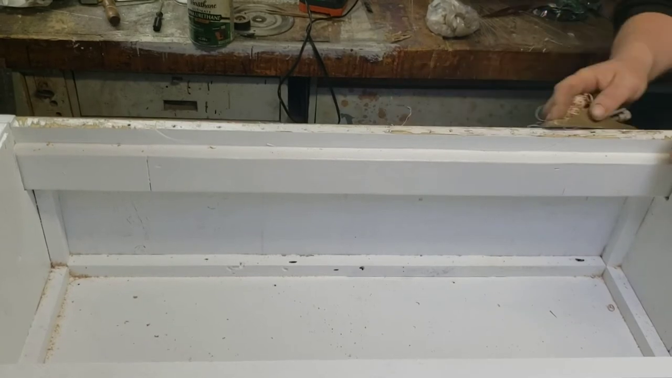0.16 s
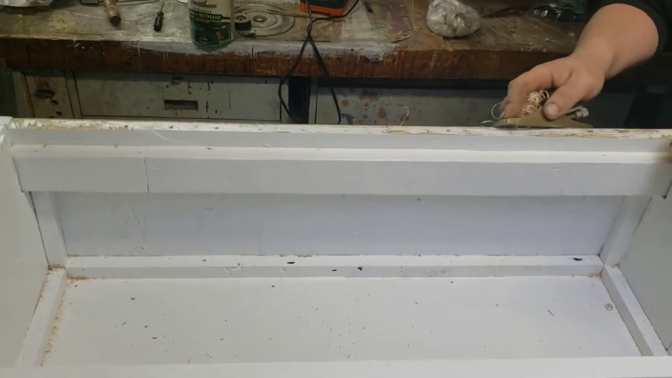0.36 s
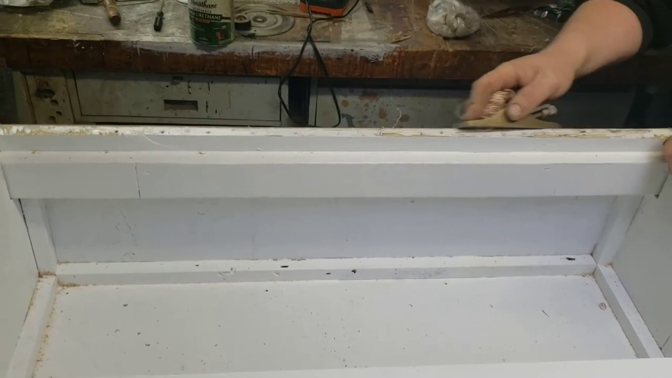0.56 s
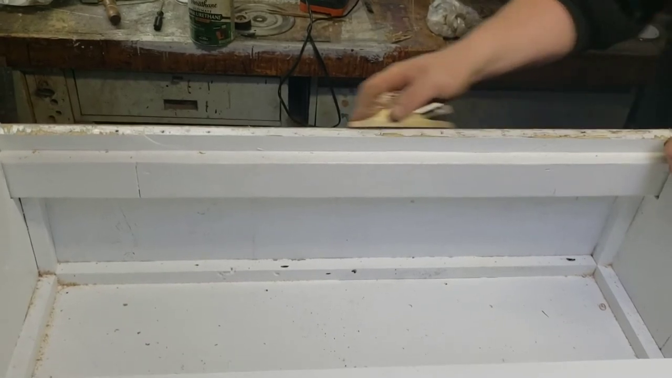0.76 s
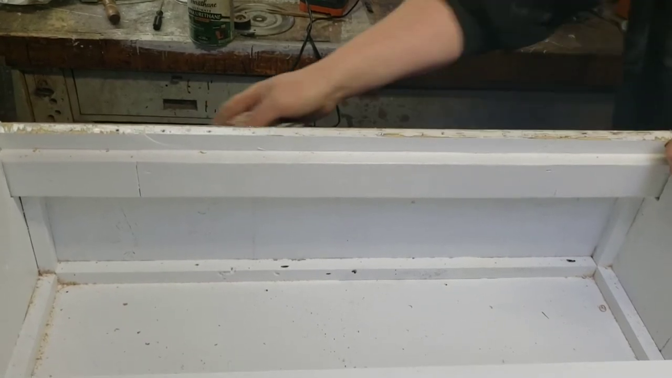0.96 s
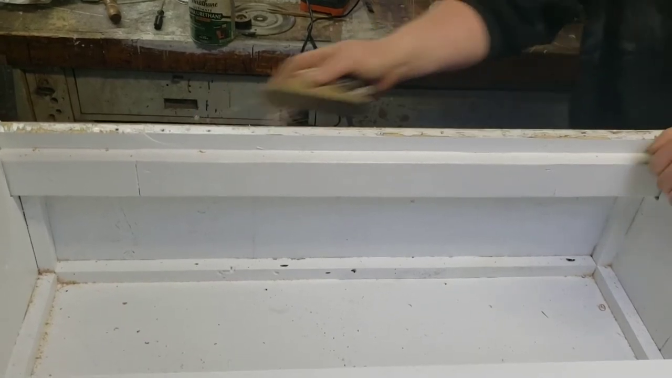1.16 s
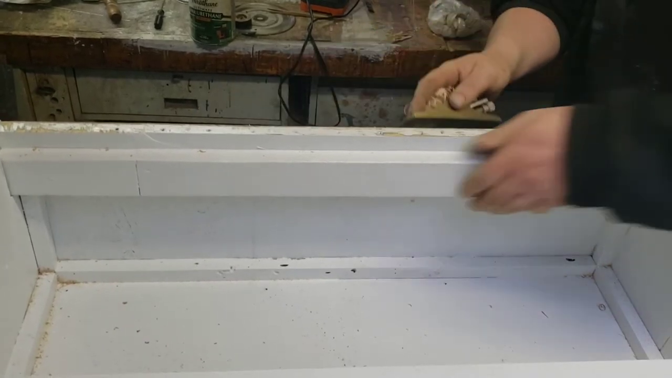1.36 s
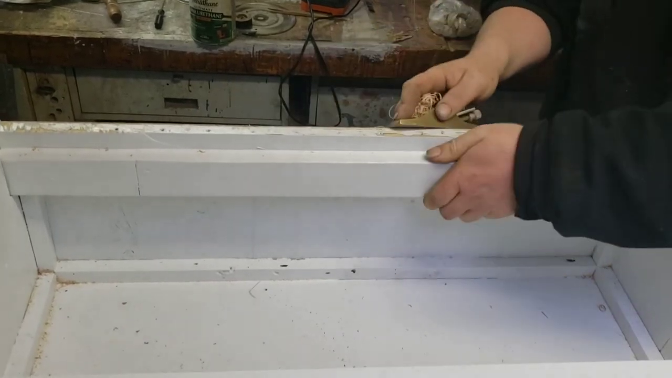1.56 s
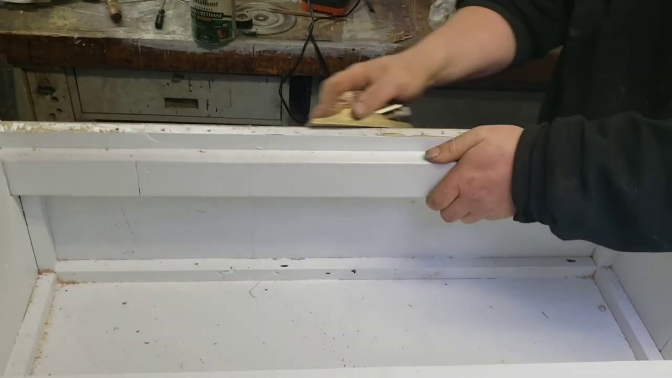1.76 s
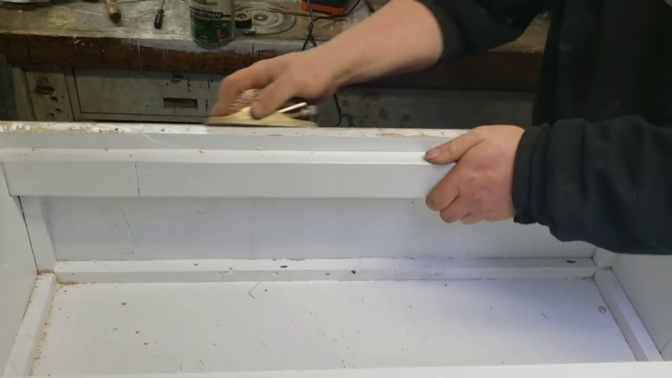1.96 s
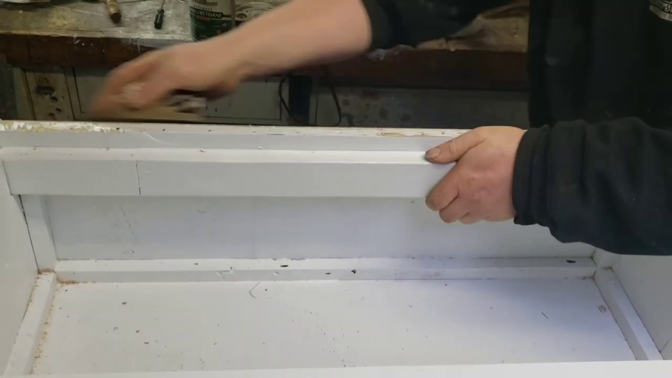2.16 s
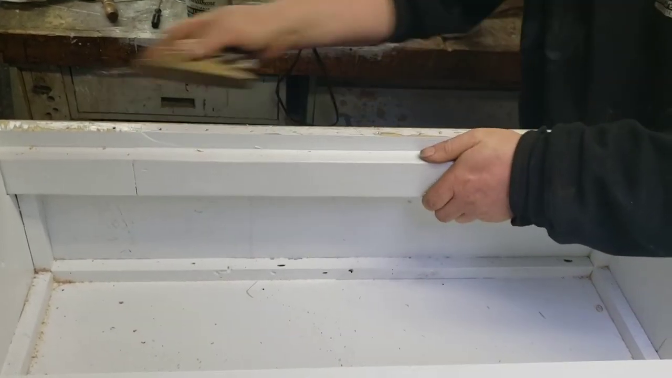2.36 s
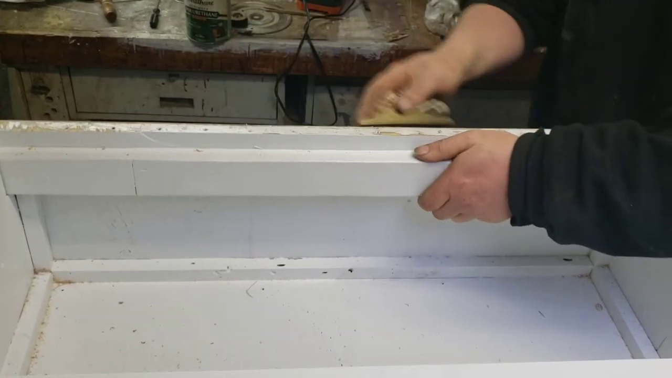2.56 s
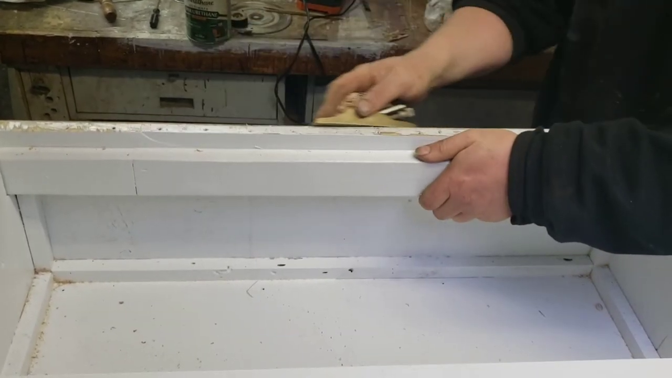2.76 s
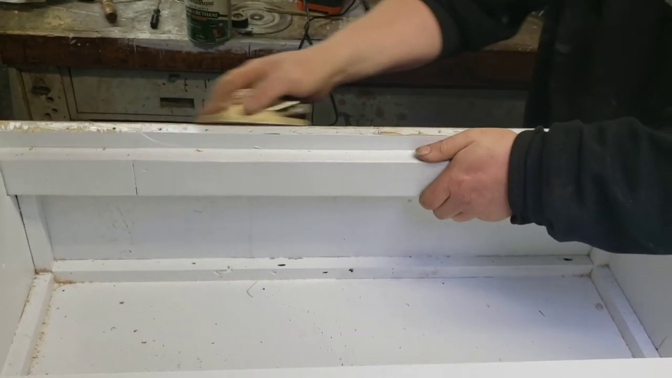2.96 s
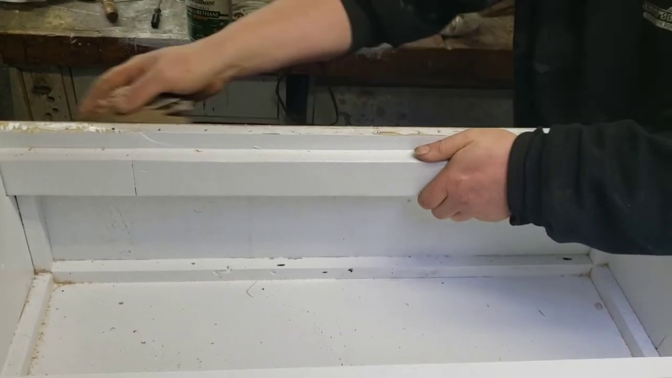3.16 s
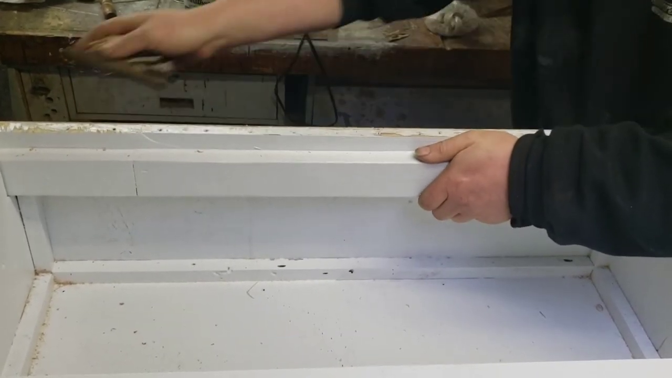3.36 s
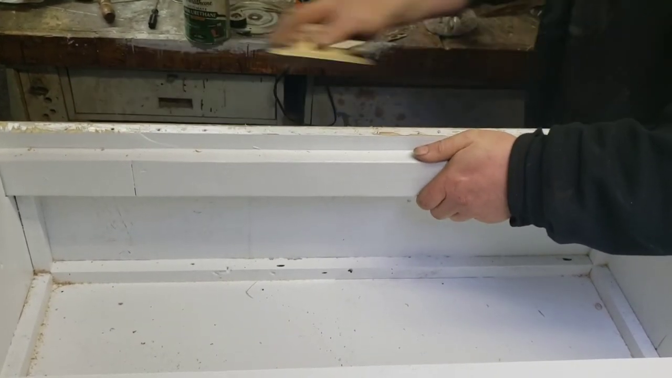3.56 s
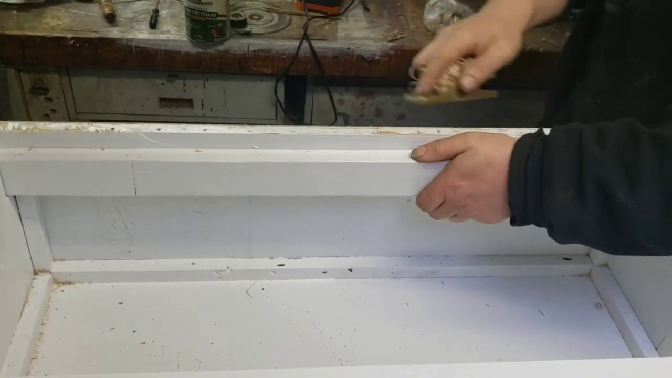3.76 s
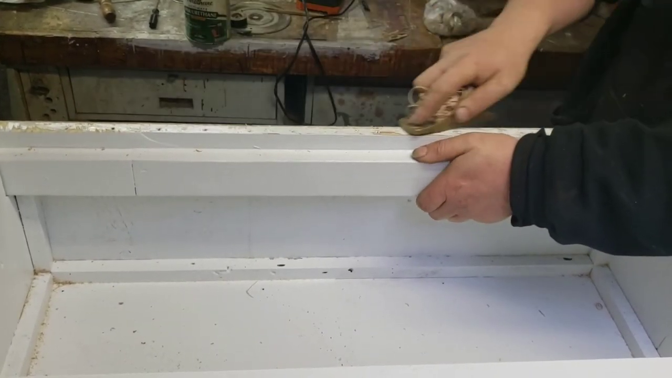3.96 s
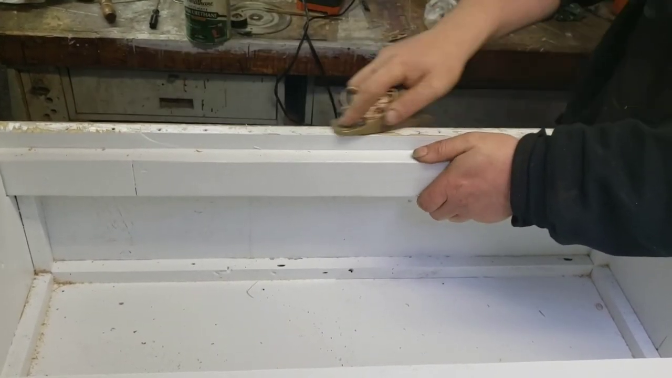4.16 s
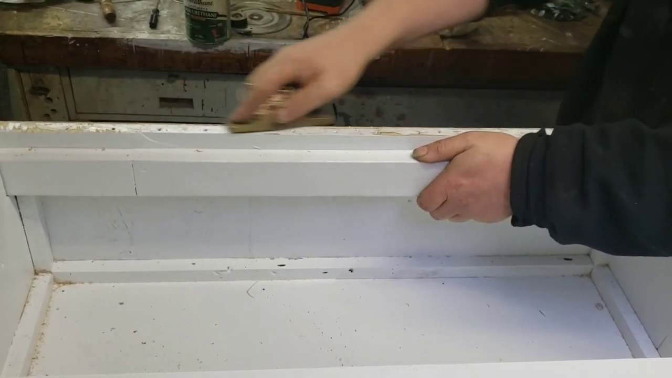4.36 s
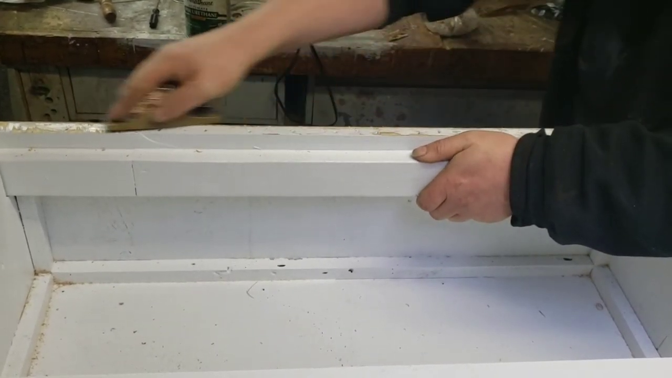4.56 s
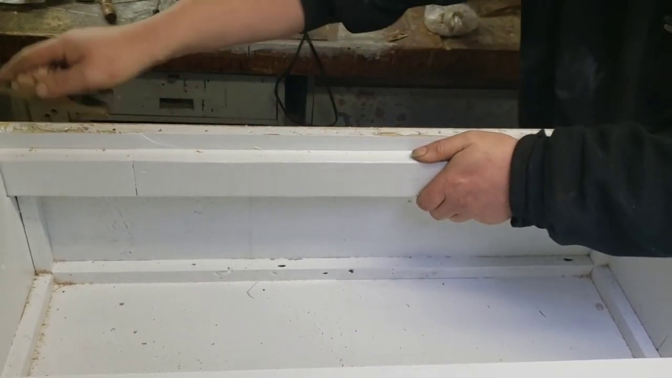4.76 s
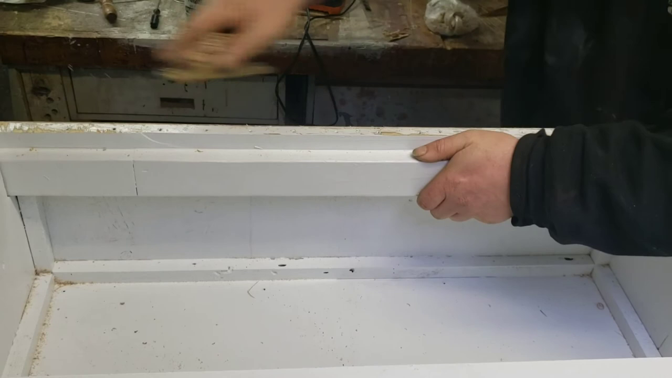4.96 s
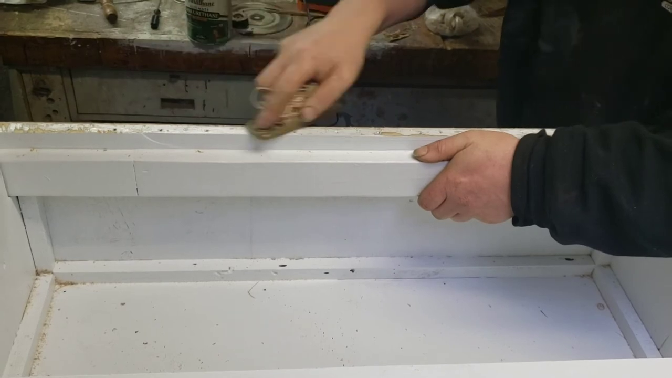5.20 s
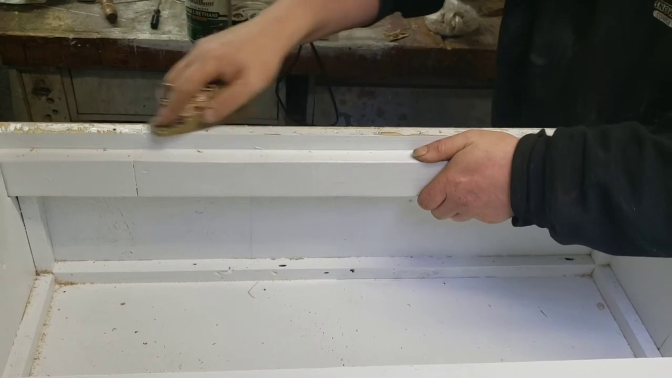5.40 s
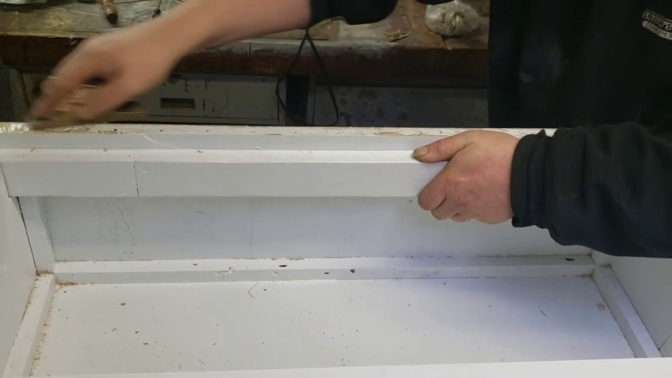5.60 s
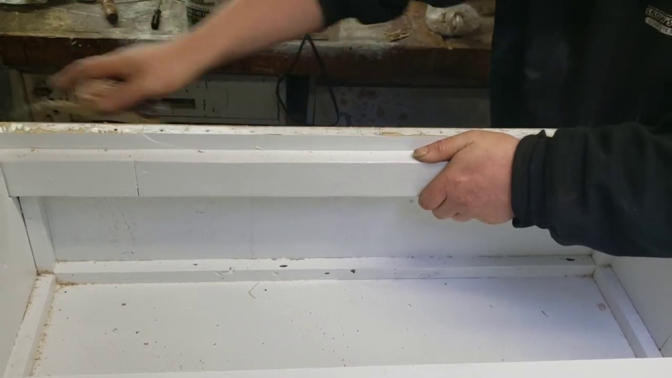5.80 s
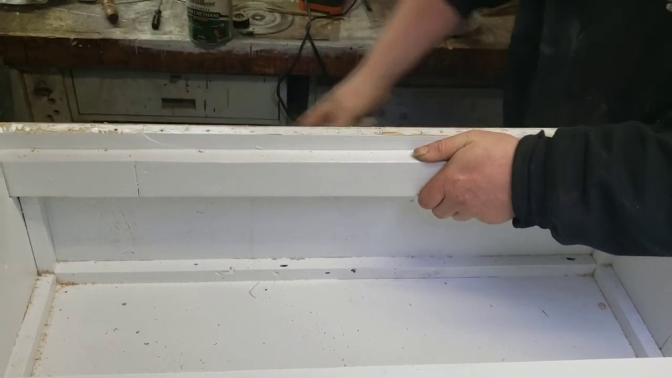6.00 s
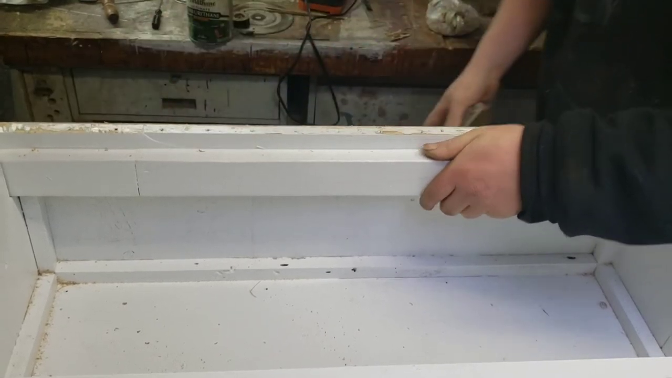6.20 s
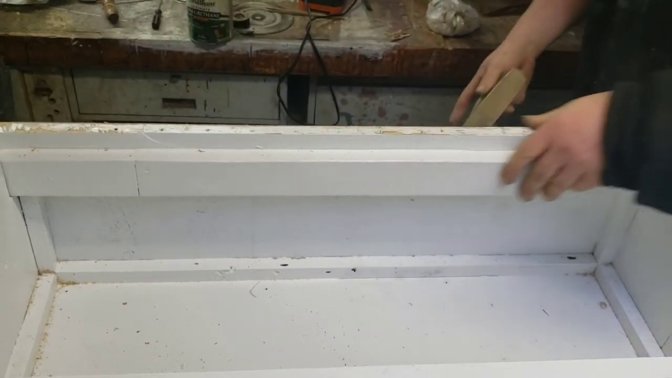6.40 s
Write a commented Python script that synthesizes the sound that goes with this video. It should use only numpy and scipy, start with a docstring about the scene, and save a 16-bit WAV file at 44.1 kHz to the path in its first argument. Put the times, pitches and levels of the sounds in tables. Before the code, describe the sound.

Close by, a metal plane bites into wood: dry, hissy tearing with a rough dragging sole and drumming panels beneath. Strokes swell as the blade sinks in and stop abruptly. Hollow thuds and small metallic clicks mark each landing, two tiny scuffs slip between the strokes, and the box rumbles slightly. Soft hand rustles fill the gaps, ending on a light brush. Short, small-room echo over a faint murmur.

```python
"""A block plane cuts along the top edge of a hollow wooden cabinet, in six longer strokes and two very short ones.
The iron tears fibres (noise shaped by random snaps), the sole drags, and bumps in the wood drum the panels.
The plane also knocks on the wood: the panels ring in many decaying modes and the metal clicks.
Hand and sleeve brush softly in between, and the cabinet rocks with a low rumble.
All this echoes in a small, quiet workshop with a faint steady drone."""
import sys
import numpy as np
from scipy import signal
from scipy.fft import rfft, irfft
from scipy.io import wavfile
from scipy.ndimage import uniform_filter1d

SR = 44100
rng = np.random.default_rng(int(sys.argv[2]) if len(sys.argv) > 2 else 0)


def dump(signal):
    """Clip the signal to [-1, 1] and save it as 16-bit WAV at the path in sys.argv[1]."""
    limited = np.clip(np.atleast_2d(signal).T, -1, 1)
    pcm = np.round(limited * 32767).astype(np.int16)
    wavfile.write(sys.argv[1], SR, pcm)


N = 284004
TIME = np.arange(N) / SR  # seconds


def gain_of(db):
    """Turns decibels into a factor for the sound pressure."""
    return 10 ** (np.asarray(db) / 20)


def evened(x):
    """Scales a signal to an average strength (rms) of 1."""
    return x / np.sqrt(np.mean(x ** 2) + 1e-20)


def read(points, hz):
    """Reads between the points of a table, with pitch on a log scale as the ear hears it."""
    f, value = np.transpose(points)
    return np.interp(np.log(hz + 1), np.log(f + 1), value)


def add(mix, s, sound):
    """Mixes a sound in at time s, cutting off whatever passes the end."""
    part = mix[..., max(round(s * SR), 0):][..., :sound.shape[-1]]
    part += sound[..., :part.shape[-1]]


def colour(x, points, rings=()):
    """Filters by a spectrum table, with narrow resonances on top; the result has rms 1."""
    hz = np.fft.rfftfreq(x.shape[-1], 1 / SR)
    db = read(points, hz)
    for f, width, peak in rings:
        db = db + peak / (1 + (2 * (hz - f) / width) ** 2)
    return evened(irfft(rfft(x) * gain_of(db), x.shape[-1]))


# how alike left and right are: pitch_hz, correlation (1 = the same, 0 = unrelated)
LEFT_RIGHT_LIKENESS = [(30, 1), (150, 0.97), (300, 0.97), (500, 0.81), (1000, 0.32), (2000, -0.15),
                       (15000, 0.024)]


def pair(two):
    """Turns two unrelated signals into left and right: alike in the bass, almost unrelated in the treble."""
    count = two.shape[-1]
    same = read(LEFT_RIGHT_LIKENESS, np.fft.rfftfreq(count, 1 / SR))
    mid, side = rfft(two) * np.sqrt([(1 + same) / 2, (1 - same) / 2])
    return irfft(np.array([mid + side, mid - side]), count)


def noise():
    """Makes hiss with equal strength at every pitch, for left and right."""
    return pair(rng.standard_normal((2, N)))


def wander(hz):
    """Drifts at random with rms 1; movements faster than hz grow weak."""
    f = np.fft.rfftfreq(N, 1 / SR)
    weight = f / (f + 10) / (1 + (f / hz) ** 2)
    return evened(irfft(rfft(rng.standard_normal(N)) * weight, N))


def fibres(per_s, spread_db, snap_s, smooth, chatter_db, chatter_hz):
    """Strength of rubbing wood: random snaps of many sizes die away, clumped as the plane catches and slips."""
    happens = rng.random(N) < per_s / SR
    sizes = gain_of(spread_db * np.minimum(rng.exponential(1, N), 4)) * happens
    power = signal.lfilter([1], [1, -np.exp(-1 / (snap_s * SR))], sizes ** 2)
    strength = np.sqrt(power / power.mean() + smooth)  # smooth: the steady part between snaps
    return evened(strength * gain_of(chatter_db * wander(chatter_hz)))


def patchy(x, patchy_db=2.5):
    """Random patches of louder and softer sound, a few hundred Hz wide and some 40 ms long."""
    z = signal.stft(x, SR, nperseg=512)[2]
    patches = rng.standard_normal(z.shape[1:])
    patches = uniform_filter1d(patches, size=4, axis=0)  # neighbouring pitches move together
    patches = evened(uniform_filter1d(patches, size=8, axis=1))  # and so do neighbouring moments
    return signal.istft(z * gain_of(patchy_db * patches), SR, nperseg=512)[1][:, :N]


# spectrum of the quiet workshop: pitch_hz, level_db (per Hz, relative)
FLOOR = [(22, -24.5), (50, -0.5), (95, 3.5), (140, 3.5), (270, -14), (450, -13.5), (650, -27),
         (1500, -36.5), (7000, -44.5), (15500, -45)]
# its faint steady drone: pitch_hz, width_hz, peak_db
FLOOR_HUM = [(355, 19, 13)]


def quiet_workshop(level_db=-56):
    """A steady low murmur: noise filtered by the floor spectrum with one narrow resonance."""
    return gain_of(level_db) * colour(noise(), FLOOR, FLOOR_HUM)


# time for the echo to die by 60 dB: pitch_hz, time_s
ROOM_T60 = [(150, 0.15), (400, 0.24), (1000, 0.32), (2800, 0.23), (7000, 0.2), (15000, .22)]
# echo against the direct sound: pitch_hz, echo_db
ROOM_DB = [(100, -14.5), (170, -2), (280, -2), (500, -2), (1000, -5.5), (3000, -2.5), (15000, -7.5)]


def room_echo(x, first_s=0.0018):
    """Dense echoes of a small cluttered room: decaying noise in which each band dies at its own speed."""
    count = SR // 2
    hz, t, z = signal.stft(pair(rng.standard_normal((2, count))), SR, nperseg=256)
    t60 = read(ROOM_T60, hz)[:, None]
    decay = gain_of(read(ROOM_DB, hz)[:, None] - 60 * t / t60)
    even_energy = np.sqrt(2 * np.log(1000) / (t60 * SR))  # long and short decays carry equal energy
    tail = signal.istft(z * decay * even_energy, SR, nperseg=256)[1][:, :count]
    tail = tail * np.clip(TIME[:count] / first_s - 1, 0, 1)  # silent until first_s, full at twice that
    return signal.fftconvolve(x, tail, axes=1)[:, :N]


# touches of hand and sleeve: loudest_s, swell_s, fade_s, hiss_db, body_db (both before the trims below)
BRUSHES = [(1.24, 0.032, 0.051, -55.5, -52.5), (1.431, 0.046, 0.091, -63.5, -63),
           (2.52, 0.082, 0.28, -66, -58.5), (3.44, 0.031, 0.043, -56.5, -58),
           (3.646, 0.015, 0.035, -48.5, -47.5), (6.07, 0.026, 0.04, -69, -68.5),
           (6.25, 0.14, 0.33, -68.5, -59), (6.44, 0.082, .1, -50, -52.5)]
# spectrum of the hiss: pitch_hz, level_db (per Hz, relative)
BRUSH_HISS = [(700, -10), (1500, 6), (2400, 0.5), (3400, -0.5), (6500, 5.5), (8500, -4.5), (12000, -7),
              (15500, -5)]
# spectrum of the soft body: pitch_hz, level_db (per Hz, relative)
BRUSH_BODY = [(150, -5.5), (330, 14), (560, 12.5), (900, 6), (1300, -2.5), (3000, -46)]
# rings of the board and the plane under a light touch: pitch_hz, width_hz, peak_db
BRUSH_RINGS = [(840, 60, 8), (2000, 230, 8.5), (2600, 210, 6), (4950, 260, 0), (6100, 160, -2)]


def brushing(hiss_db=-2, body_db=-2):
    """Skin and cloth slide over painted wood: filtered noise that swells and fades with each touch."""
    levels = np.zeros((2, N))
    for loudest, swell, fade, *dbs in BRUSHES:
        since = TIME - loudest
        touch = np.exp(-np.where(since < 0, (since / swell) ** 2, since / fade))
        levels += np.outer(gain_of(dbs), touch)
    hiss = colour(noise(), BRUSH_HISS, BRUSH_RINGS) * levels[0] * gain_of(hiss_db)
    body = colour(noise(), BRUSH_BODY, BRUSH_RINGS) * levels[1] * gain_of(body_db)
    return patchy(hiss + body)


# the cabinet rocks on its feet: middle_s, level_db, half_length_s
ROCKING = [(0.877, -44.5, 0.14), (1.573, -42, 0.063), (2.269, -47, 0.12), (3.385, -46, 0.047)]
# spectrum of the rumble: pitch_hz, level_db (per Hz, relative)
ROCK = [(25, -52.5), (37, -15.5), (47, 2), (72, -2), (95, -11.5), (140, -19.5), (300, -61.5)]


def rocking(push_db=-24):
    """Low rumble of the whole cabinet: a little under every push, more when it sways on its feet."""
    sway = sum(gain_of(db) * np.exp(-((TIME - s) / half) ** 2) for s, db, half in ROCKING)
    panels = planing()[-1]
    return colour(noise(), ROCK) * (sway + panels * gain_of(push_db))


# modes of the cabinet: pitch_hz, above_db (pushed from above, counts 1.5 - tilt times),
# corner_db (pushed on the corner, counts tilt times), t60_s (time to die by 60 dB)
CABINET = [(146.3, 2, -15.5, 0.14), (162.3, -12, -5.5, 0.23), (187.9, -8.5, -4, 0.13),
           (223.3, 4.5, -11, 0.12), (284, -8, -9.5, 0.26), (312.9, -1, -16.5, 0.16), (361, -9, -15, 0.2),
           (399.4, -10, -11.5, 0.13), (447.4, -4, -4, 0.098), (493.3, -6.5, -2.5, 0.13),
           (555, -5, 0.5, 0.068), (640, -19.5, -2, 0.061), (660, -15, -16, 0.066), (783, -10.5, -5.5, 0.16),
           (861, -13.5, -7.5, 0.098), (1034, -20.5, -4.5, 0.14), (1330, -25.5, -6, 0.15),
           (1350, -26.5, -12, .08), (1590, -19.5, -7.5, .11), (2380, -33.5, -14, .05)]
# the crowded upper modes of the panels: pitch_hz, level_db (per Hz, relative)
UPPER = [(250, -15.5), (420, -15.5), (600, -5.5), (850, -3), (1100, -11.5), (1350, -8), (1600, -13),
         (1850, -23), (2500, -19), (5000, -35.5)]


def cabinet(tilt, rise_s=0.00033, upper_db=-9, upper_t60=0.094):
    """Ring of the panels after one blow: its direction picks the modes, and weaker ones merge between them."""
    t = np.arange(SR // 2) / SR
    ring = np.zeros(len(t))
    for k, (hz, above, corner, t60) in enumerate(CABINET):
        db = (1.5 - tilt) * above + tilt * corner - 60 * t / t60
        ring += (-1) ** k * gain_of(db) * np.sin(2 * np.pi * hz * t)
    upper = colour(rng.standard_normal(len(t)), UPPER) * gain_of(upper_db - 60 * t / upper_t60)
    return (ring + upper) * (1 - np.exp(-t / rise_s)) ** 2


def push(hz):
    """Force of one contact: the harder (higher hz), the shorter."""
    t = np.arange(SR // 50) / SR
    force = t * np.exp(-2 * np.pi * hz * t)
    return force / force.sum()


# the plane meets the wood: start_s, force_db, hardness_hz, tilt (0 flat - 1 on the corner),
# click_db (of the metal, at its start)
KNOCKS = [(0.015, -12.5, 420, 0.26, -40), (0.058, -22.5, 1300, 0.12, -38.5),
          (0.318, -31.5, 700, 0.03, -55.5), (0.75, -23, 900, 0.37, -60), (0.7901, -17.5, 700, 0.58, -22.5),
          (1.138, -39.5, 450, 0.27, -56), (1.449, -12, 347, 0.24, -37), (1.53, -28.5, 250, 0, -54),
          (1.669, -20, 395, 0, -42), (2.035, -22, 500, 0, -47.5), (2.409, -54, 1200, 0.5, -53),
          (2.613, -7.5, 330, 0.27, -32), (2.748, -21.5, 402, 0.4, -34.5), (3.23, -23.5, 300, 0.33, -63),
          (3.959, -7, 760, 0.76, -35.5), (3.976, -31, 1000, 0.6, -37.5), (4.182, -23.5, 700, 0.33, -49),
          (4.46, -22.5, 500, 0.55, -49), (5.1682, -13, 1410, 0.72, -29), (5.301, -26.5, 700, 0, -42),
          (5.955, -50, 300, 0.02, -80)]
# spectrum of the metal click: pitch_hz, level_db (per Hz, relative)
CLICK = [(200, 0), (900, 17), (1500, 0.5), (2800, 2), (3900, -4), (5000, -13), (7000, -14.5), (9000, -27.5),
         (15500, -32.5)]


def knocks(click_t60=0.09):
    """The sole lands: a short force makes the cabinet boom, and fading noise makes the metal click."""
    out = np.zeros((2, N))
    t = np.arange(SR // 4) / SR
    for s, force_db, hard_hz, tilt, click_db in KNOCKS:
        boom = signal.fftconvolve(cabinet(tilt), push(hard_hz))
        add(out, s, gain_of(force_db) * boom)
        click = colour(pair(rng.standard_normal((2, len(t)))), CLICK, IRON)
        add(out, s, click * gain_of(click_db - 60 * t / click_t60))
    return out


def drumming(bump_hz=650):
    """Bumps in the wood jolt the sliding plane and keep the panels ringing."""
    out = np.zeros((2, N))
    bumps = noise() * fibres(per_s=370, spread_db=5.5, snap_s=0.0044, smooth=0.26, chatter_db=1.5, chatter_hz=40)
    for row in STROKES:
        start, tilt, panels = row[0], row[5], stroke(*row)[-1]
        force = bumps[:, round(start * SR):][:, :len(panels)] * panels
        ring = signal.fftconvolve(cabinet(tilt), push(bump_hz))
        ring = ring / np.linalg.norm(ring)
        add(out, start, signal.fftconvolve(force, ring[None], axes=1))
    return out


# the iron meets tougher or softer grain for a moment: middle_s, half_length_s,
# more_bite_db, more_crispness_db (on top of the bite), more_drag_db
CATCHES = [(0.557, 0.024, 3.5, -0.5, 6), (0.683, 0.012, 4, -0.5, 3.5), (0.777, 0.01, -13, 5, 1.5),
           (0.803, 0.035, 5, -1, -5), (1.983, .02, 4.5, -0.5, 1), (2.165, 0.029, 1, 0.5, 5),
           (2.86, 0.15, -4, 0.5, -3.5), (2.911, 0.036, 7.5, -3, -1.5), (4.15, 0.012, 5, 3, -3),
           (4.217, 0.022, 6, -4, 3.5), (4.331, 0.041, 0.5, -4, -9), (4.408, 0.025, 7, -0.5, -2),
           (4.478, 0.034, 7, 1.5, 1.5), (4.553, 0.017, -4.5, -3, -3), (4.725, 0.034, 5, -2.5, 1),
           (5.499, 0.03, 3, -2, 7), (5.654, 0.041, 7, -1, 2.5)]
EXIT_DB, EXIT_S = 10, 0.0098  # the quick drop as the iron leaves the wood
SINK_SHAPE = 2.53  # the higher, the more suddenly the iron takes hold
SOLE_LEAD = 0.16  # the sole already rubs before the iron bites: share of the entry that it skips
CRISP_FOLLOW, DRAG_FOLLOW = .3, 1  # dB per dB of cutting depth (crispness on top of the bite)
DRUM_FOLLOW, DRUM_FADE = .4, 1  # the panels answer the push: their share of the entry and of the run-out


def stroke(start, end, sink_s, skid_db, run_out, tilt, bite, bite_swell, crisp,
           drag, drag_swell, drum, drum_swell):
    """Gains of tearing, shaving, sole and panels in a stroke: the iron skids, sinks in, catches and runs out."""
    t = TIME[(TIME >= start) & (TIME < end + .4)]
    along = np.minimum((t - start) / (end - start), 1) - .5  # -0.5 at the start, 0.5 at the end
    after = np.maximum(t - end, 0)
    entry = -skid_db * np.exp(-((t - start) / sink_s) ** SINK_SHAPE)
    depth = entry - EXIT_DB * (1 - np.exp(-after / EXIT_S)) - run_out * after
    dig, snap, rub = sum(np.outer(more, np.exp(-((t - s) / half) ** 4)) for s, half, *more in CATCHES)
    tear = bite + bite_swell * along + depth + dig
    shaving = tear + crisp + CRISP_FOLLOW * depth + snap
    sole = drag + drag_swell * along + DRAG_FOLLOW * depth - SOLE_LEAD * entry + rub
    panels = drum + drum_swell * along + DRUM_FOLLOW * entry - DRUM_FADE * run_out * after
    return gain_of([tear, shaving, sole, panels])


# the plane runs along the wood; levels are for mid-stroke, before entry, catches and trims,
# and each swell is the growth from start to end: start_s, end_s, sink_s (time to sink in),
# skid_db (how much softer before that), run_out_db_per_s, tilt (0 flat - 1 on the corner),
# bite_db (of the iron), bite_swell_db, crisp_db (of the shaving, on top of the bite),
# drag_db (of the sole), drag_swell_db, drum_db (of the panels), drum_swell_db
STROKES = [(0.089, 0.338, 0.051, 16.5, 299.5, .41, -47.5, 12.5, -6.5, -41.5, 17.5, -36.5, 3.5),
           (0.398, 0.908, 0.15, 19, 146.5, 0.12, -37.5, 5, -3.5, -32.5, -4, -32, 4),
           (1.487, 1.521, 0.009, 13, 257, 0.11, -50.5, 13.5, -8, -46.5, -2, -40, -4.5),
           (1.546, 2.178, 0.11, 30.5, 131.5, 0.16, -35, 1, -4.5, -34.5, 1, -30.5, -3),
           (2.631, 3.195, 0.095, 29.5, 185.5, 0.18, -35, 4.5, -6, -35, 11.5, -35.5, 1.5),
           (3.304, 3.334, 0.035, 7, 78.5, 0.067, -55, 4.5, -6.5, -55, 13, -43.5, -7),
           (3.973, 4.746, 0.075, 17.5, 257.5, 0.52, -41.5, 6.5, -0.5, -38.5, 3, -38.5, -2.5),
           (5.166, 5.665, 0.075, 22, 236, 0.36, -42.5, 5, -2.5, -35.5, -5.5, -31, -6.5)]


def planing():
    """Lays all strokes out in time: gains of tearing, shaving, sole and panels."""
    out = np.zeros((4, N))
    for row in STROKES:
        add(out, row[0], stroke(*row))
    return out


# spectrum of tearing fibres: pitch_hz, level_db (per Hz, relative)
TEAR = [(500, -42.5), (1500, -6), (2500, -1), (3900, -0.5), (4600, -0.5), (5400, -2), (6700, -3),
        (7400, -3), (8300, -11), (10500, -16.5), (16000, -15)]
# spectrum of the crisp shaving: pitch_hz, level_db (per Hz, relative)
CRISP = [(5000, -42), (7500, -8.5), (8700, -9.5), (10000, -4), (12300, -2.5), (13500, -4.5), (15500, -4.5)]
# spectrum of the dragging sole: pitch_hz, level_db (per Hz, relative)
DRAG = [(150, -16.5), (400, 1.5), (650, 1), (1000, 0.5), (1400, -2), (1650, -8.5), (1850, -5), (2500, -11),
        (4500, -25.5), (10000, -54.5)]
# rings of the plane's iron and body, heard in the knocks too: pitch_hz, width_hz, peak_db
IRON = [(1228, 45, 4), (1560, 40, 5), (1670, 40, 4), (2467, 40, 3), (3876, 70, 3), (5233, 180, 6),
        (6043, 90, 4.5)]


def cutting(tear_db=2, crisp_db=2.5, drag_db=-0.5, waver_db=1.4, waver_hz=18):
    """Snapping fibres ring the plane's iron; the sole rasps over the same grain, and the hand's pressure wavers."""
    bite, crisp, drag, _ = planing()
    grain = fibres(per_s=2700, spread_db=-1.0, snap_s=0.00026, smooth=1.0, chatter_db=0.3, chatter_hz=108.4)
    tear = colour(noise() * grain, TEAR, IRON) * bite * gain_of(tear_db)
    shaving = colour(noise() * grain, CRISP) * crisp * gain_of(crisp_db)
    sole = colour(noise() * grain, DRAG, IRON) * drag * gain_of(drag_db)
    pressure = gain_of(waver_db * wander(waver_hz))
    return patchy(tear + shaving + sole) * pressure


def scene():
    """The plane, the cabinet and the hand, with their echoes in the quiet workshop."""
    near = brushing() + rocking() + knocks() + drumming() + cutting()
    return near + room_echo(near) + quiet_workshop()


def record(dry, edge_hz=15750):
    """Removes the treble above edge_hz, the upper limit of the recorder."""
    lowpass = signal.firwin(511, edge_hz, window=("kaiser", 9), fs=SR)
    return signal.oaconvolve(dry, lowpass[None], "same")


dry = scene()
out = record(dry)
dump(out)
```